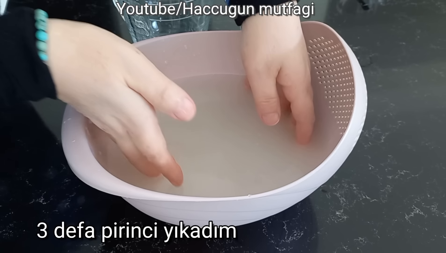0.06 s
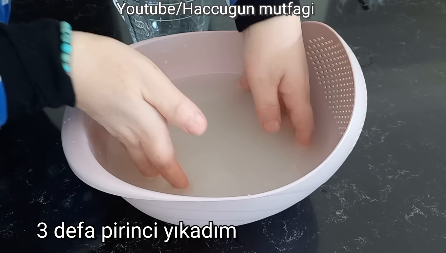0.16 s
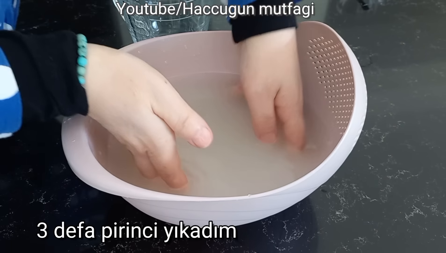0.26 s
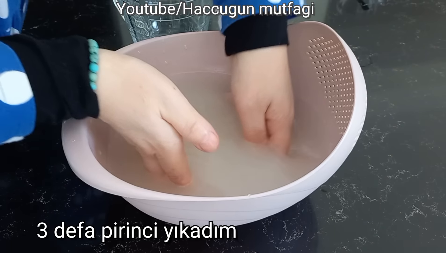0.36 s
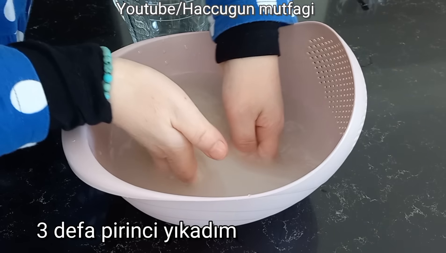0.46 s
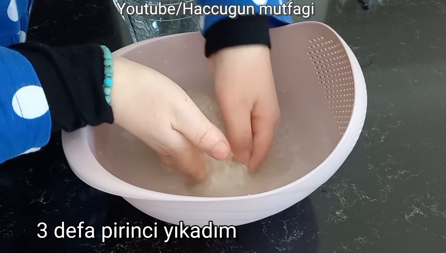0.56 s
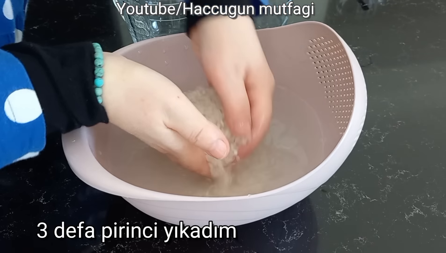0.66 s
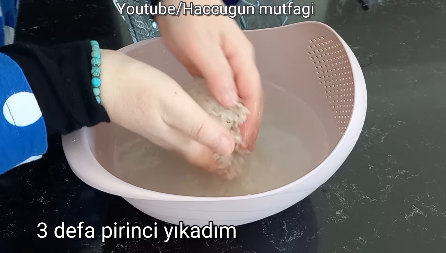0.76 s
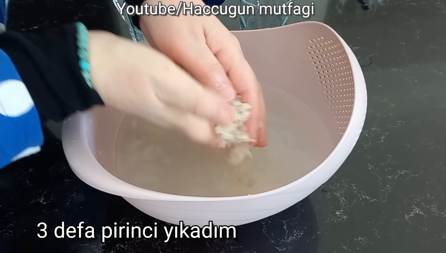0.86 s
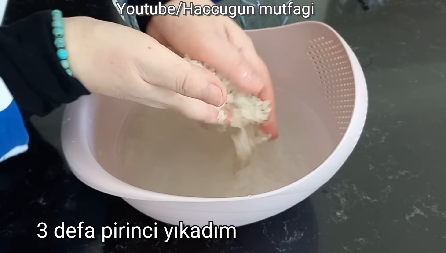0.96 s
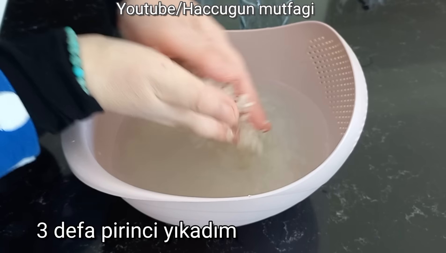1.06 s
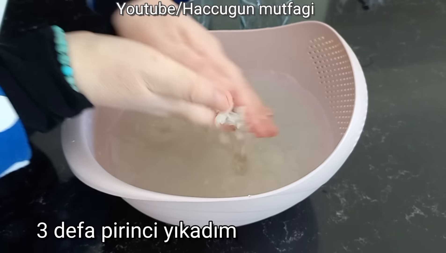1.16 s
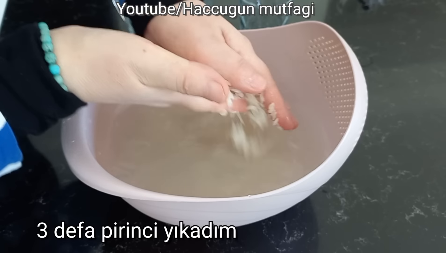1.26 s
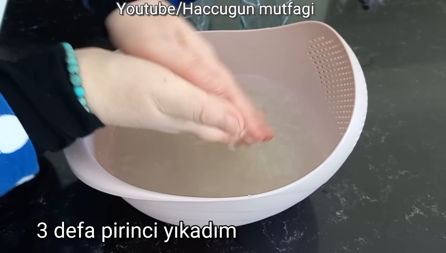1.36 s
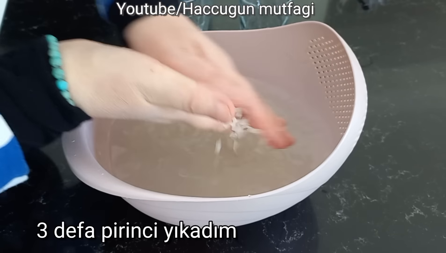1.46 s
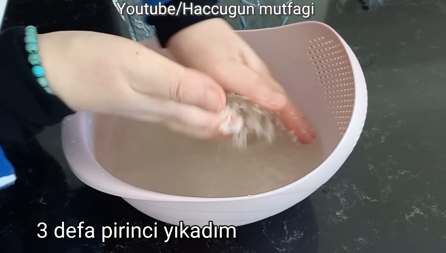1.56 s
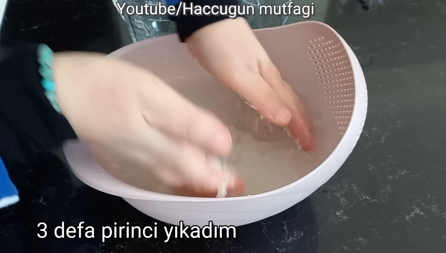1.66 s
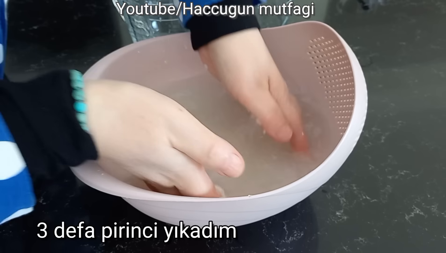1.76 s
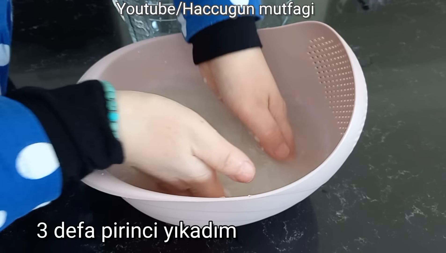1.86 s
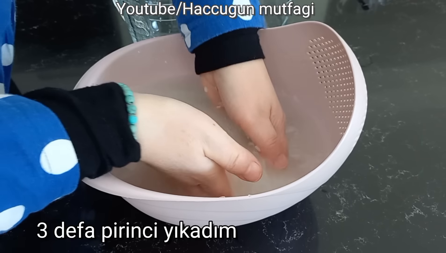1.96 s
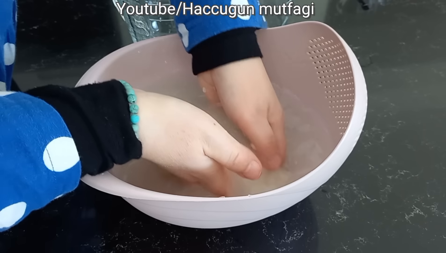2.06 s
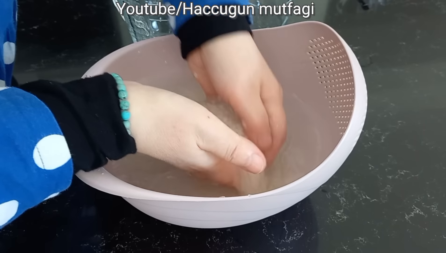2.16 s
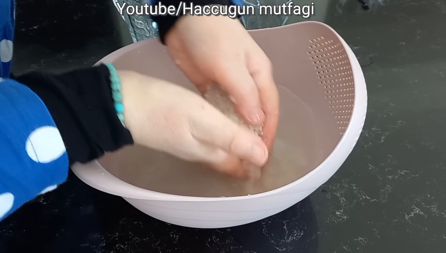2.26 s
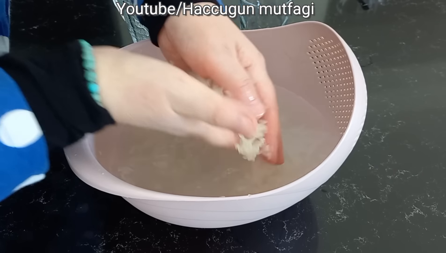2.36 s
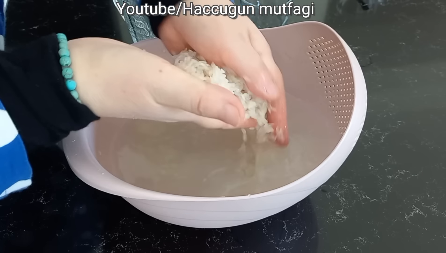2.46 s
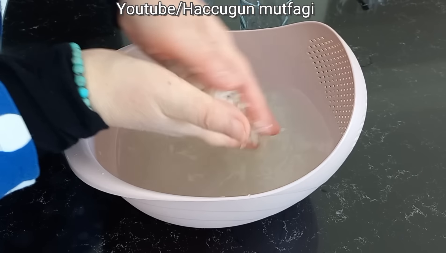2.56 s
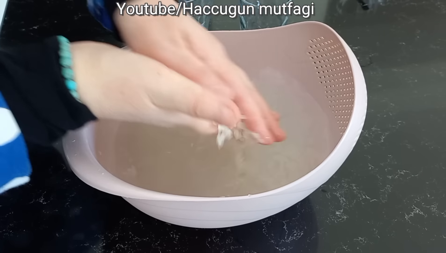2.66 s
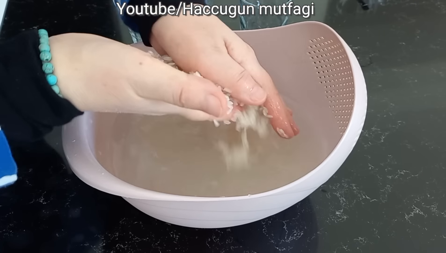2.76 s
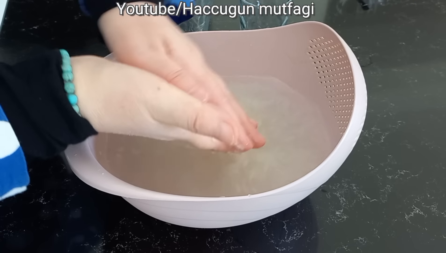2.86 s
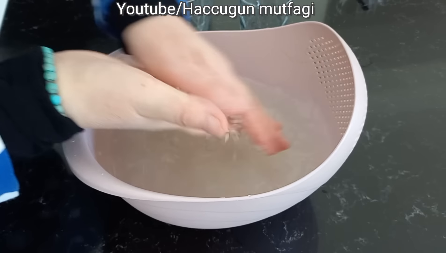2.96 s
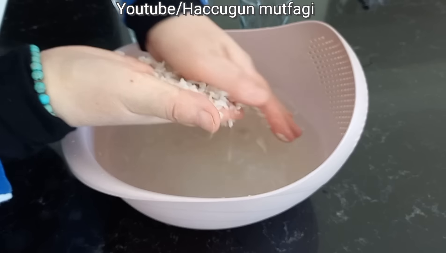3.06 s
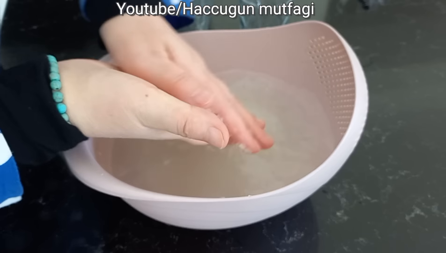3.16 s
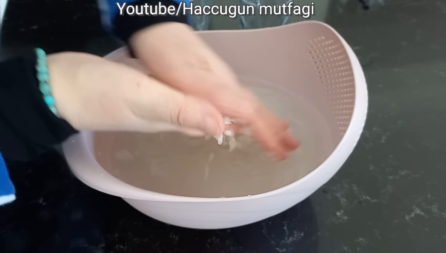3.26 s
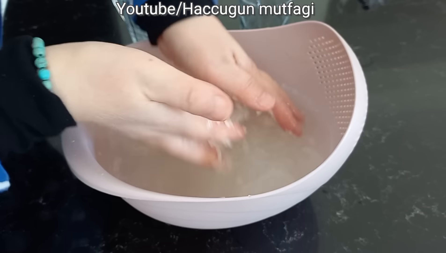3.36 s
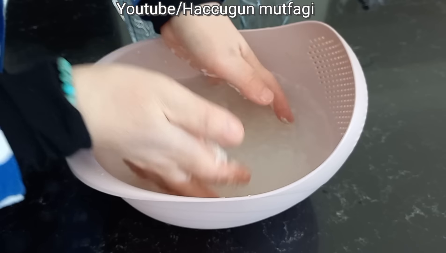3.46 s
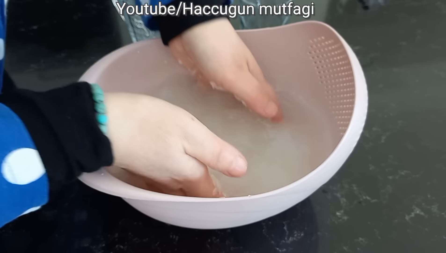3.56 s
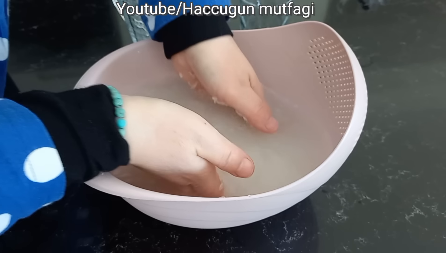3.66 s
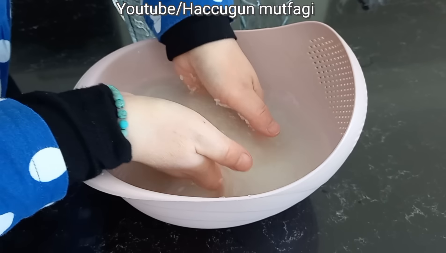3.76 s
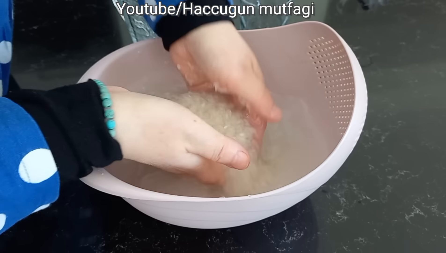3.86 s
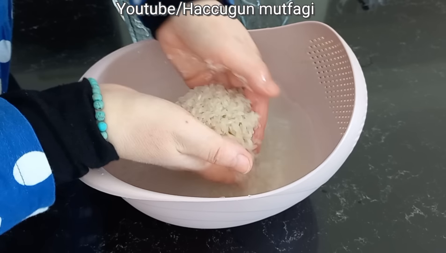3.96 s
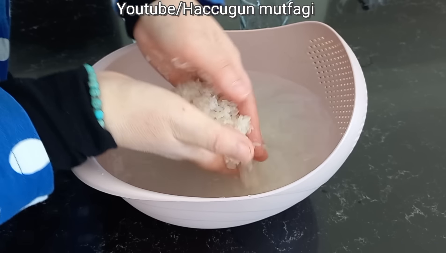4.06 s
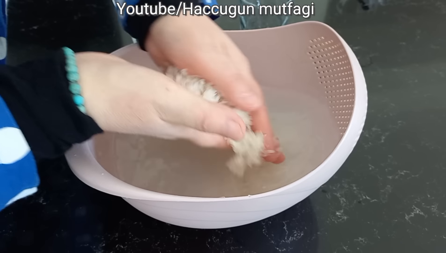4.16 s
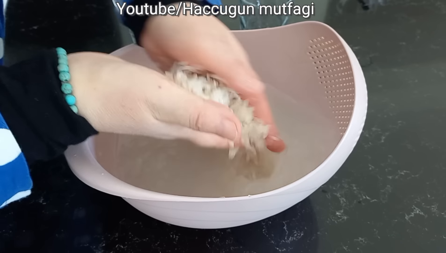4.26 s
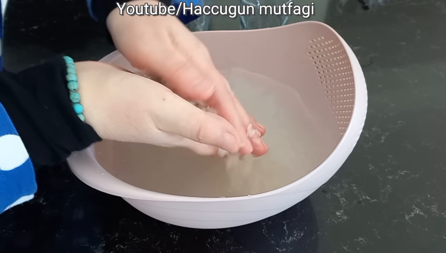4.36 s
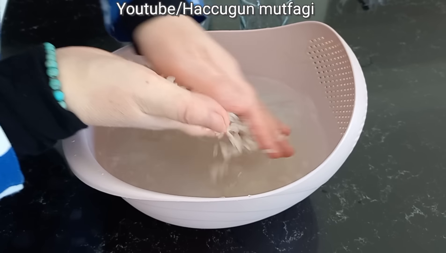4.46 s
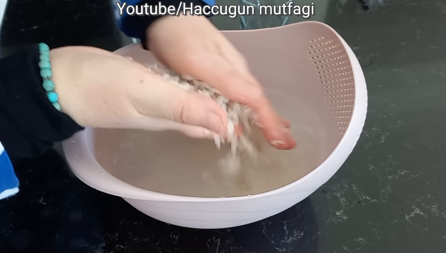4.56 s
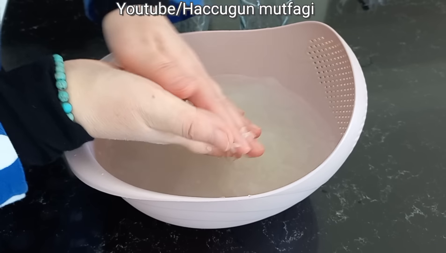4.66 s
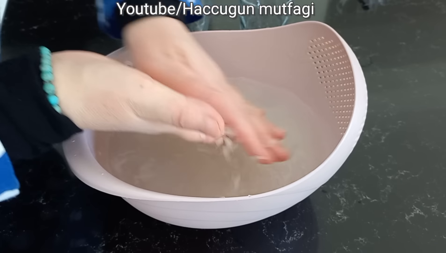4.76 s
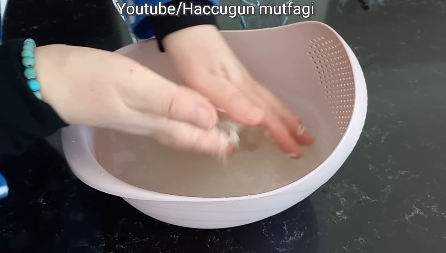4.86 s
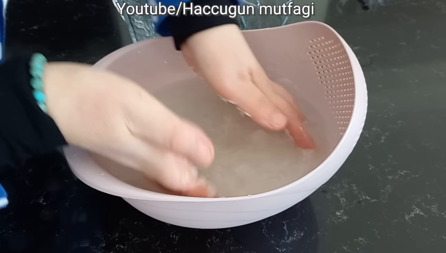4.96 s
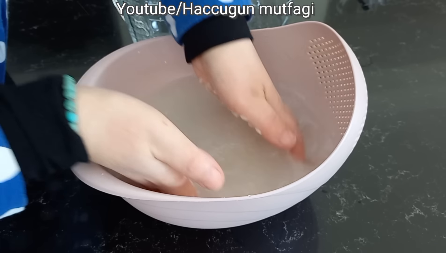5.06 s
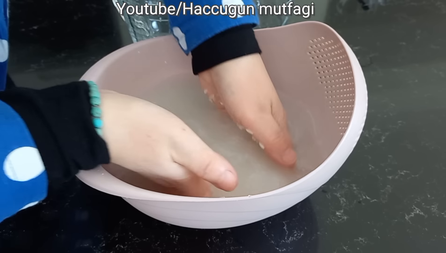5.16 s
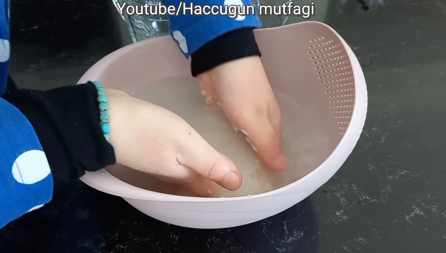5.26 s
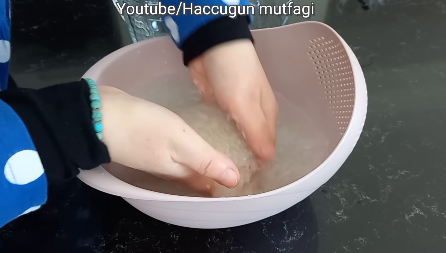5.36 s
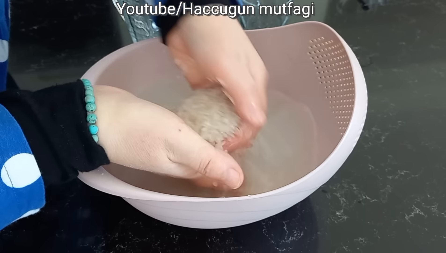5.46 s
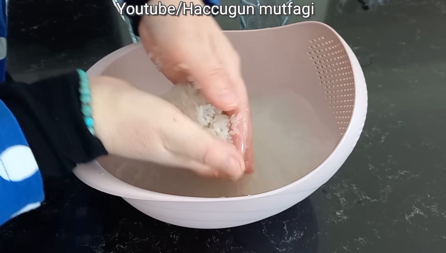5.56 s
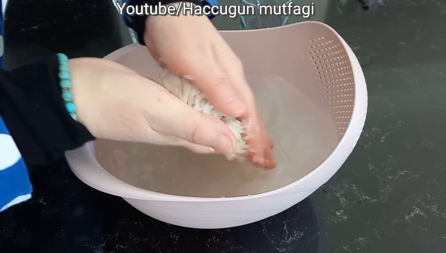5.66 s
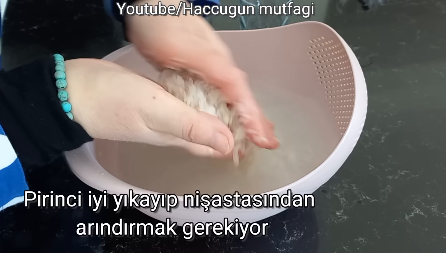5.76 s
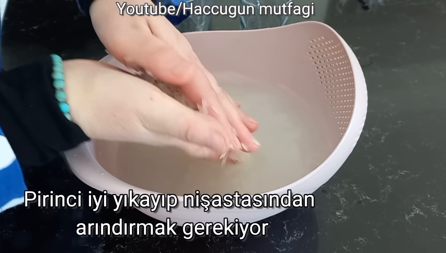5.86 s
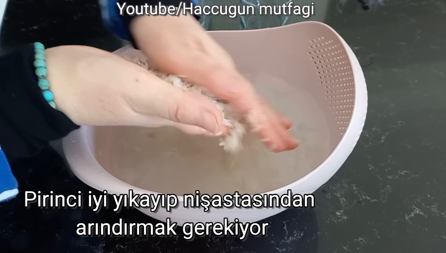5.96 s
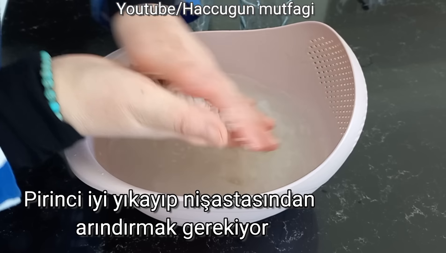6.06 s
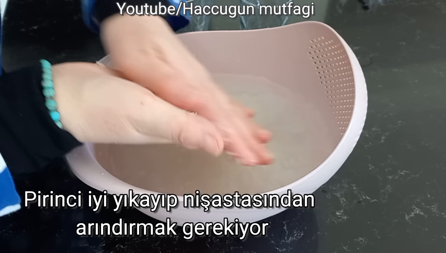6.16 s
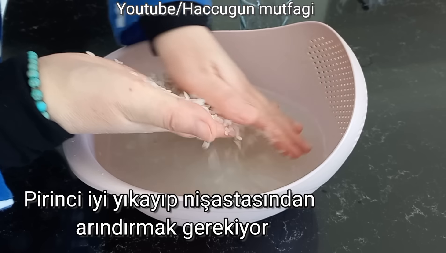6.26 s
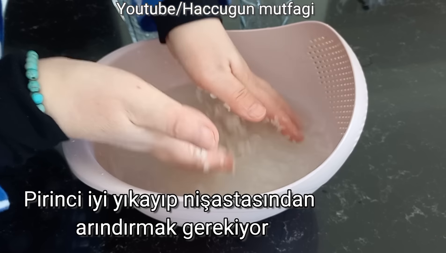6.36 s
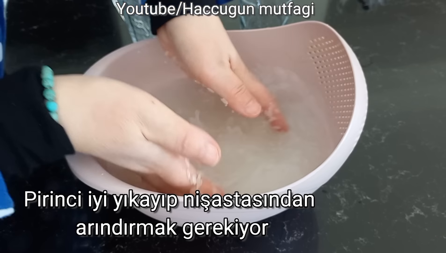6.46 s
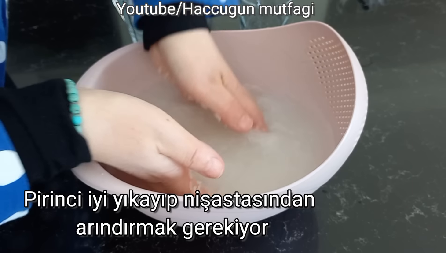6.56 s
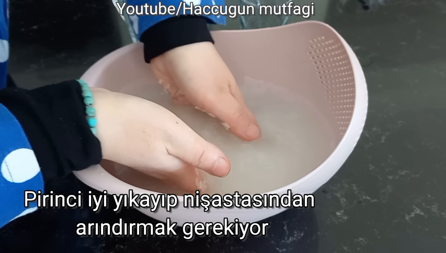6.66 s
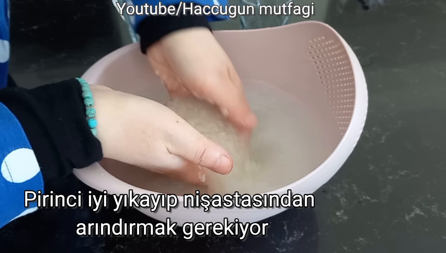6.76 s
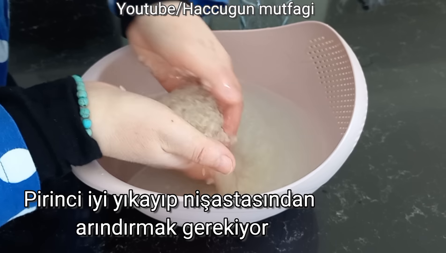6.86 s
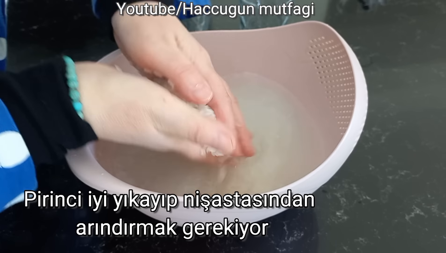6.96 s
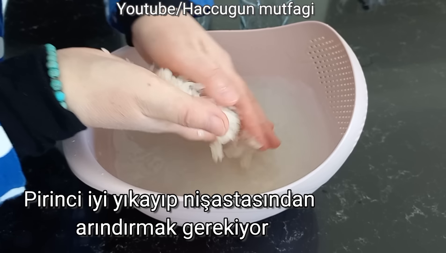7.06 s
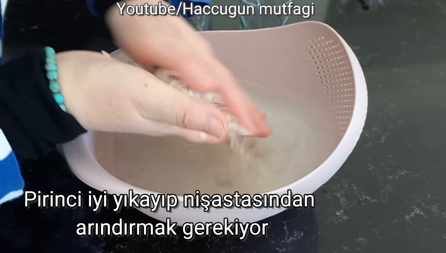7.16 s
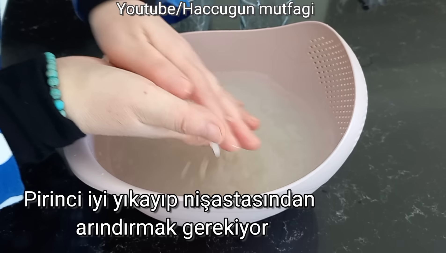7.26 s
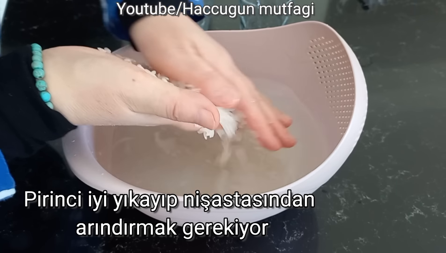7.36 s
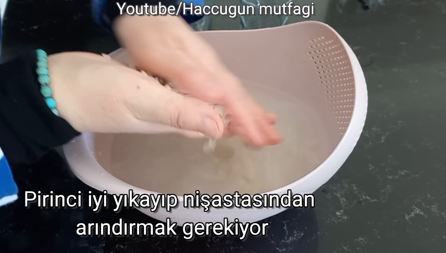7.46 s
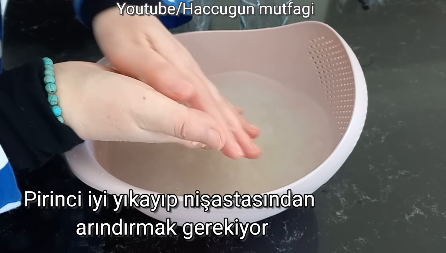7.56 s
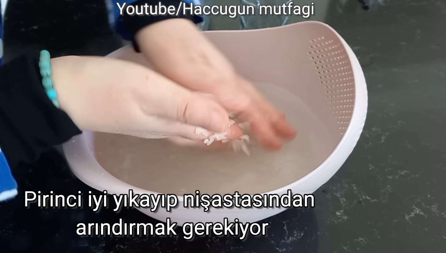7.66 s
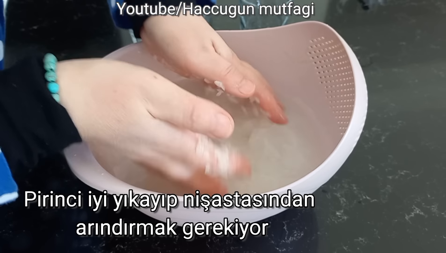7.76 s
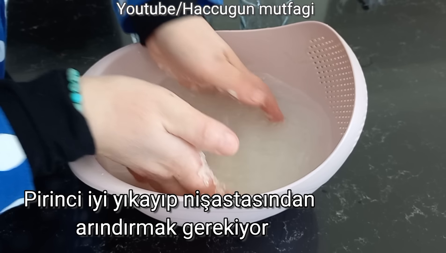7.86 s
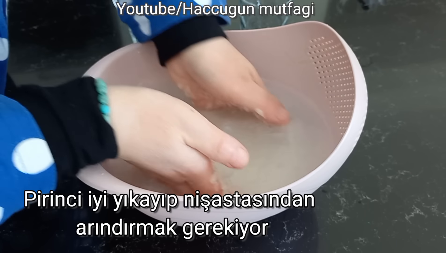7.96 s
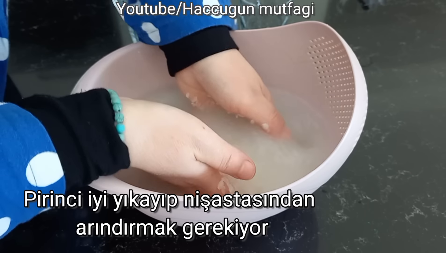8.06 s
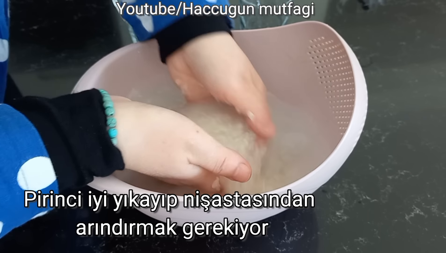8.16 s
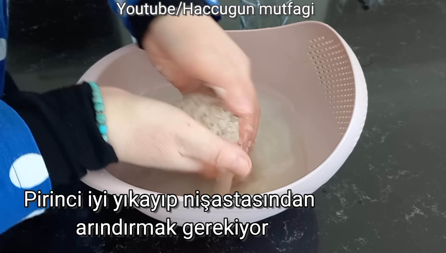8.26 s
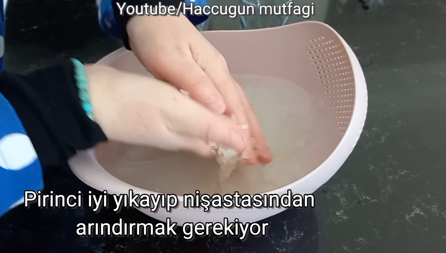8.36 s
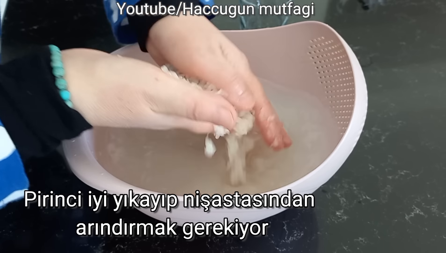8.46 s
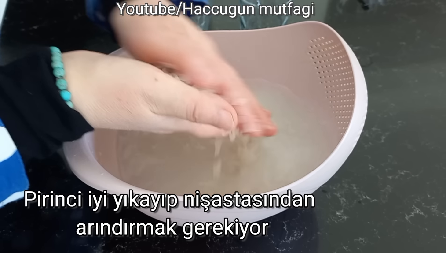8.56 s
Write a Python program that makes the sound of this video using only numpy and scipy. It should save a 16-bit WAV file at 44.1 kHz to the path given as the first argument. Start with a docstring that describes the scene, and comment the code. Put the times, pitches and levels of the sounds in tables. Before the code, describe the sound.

For the first second there is only a soft, muffled stir of hands moving rice through water in a plastic bowl, over a faint kitchen hiss and whir. From 1 to 1.8 seconds a dripping handful is rubbed between the palms in quick strokes: wet grains crunch, air pockets squelch sharply, and falling water makes small bubbly plops. Fingers knock dully on the bowl at about 1.8, 2.3 and 5 seconds. The rubbing returns from 2.3 to 3.5, 4 to 5, and 5.5 to 6.5 seconds, with a sharp wet pop near 3 seconds. Between rounds come quieter, low swishes as more rice is scooped up. A slightly gentler round runs from 7 to 7.9 seconds, and a last one starts at 8.3 and ends with a squelch near 8.6. Everything sounds close and slightly to the left, with short reflections from a small room.

```python
"""A muffled rumble stirs over the faint hiss of a small kitchen: two hands scoop rice through the water
in a plastic colander bowl. Again and again they lift a dripping handful and rub it between the palms.
Wet grains crunch by friction, air pockets burst and squelch, and falling water traps bubbles that ring
as tiny resonators. Fingers now and then knock the bowl; bowl, counter and walls add short reflections."""
import sys
import numpy as np
from scipy import signal
from scipy.fft import rfft, irfft, next_fast_len
from scipy.io import wavfile
from scipy.ndimage import map_coordinates

SR = 44100
rng = np.random.default_rng(int(sys.argv[2]) if len(sys.argv) > 2 else 0)


def digitize_waveform(pressure):
    """Quantize a signal to 16-bit integers and store it at the path in sys.argv[1].

    Rows of a 2-D input are taken as channels; values are limited to [-1, 1].
    """
    field = np.atleast_2d(pressure).T
    bounded = np.clip(field, -1, 1)
    quanta = np.round(bounded * 32767).astype(np.int16)
    wavfile.write(sys.argv[1], SR, quanta)


N = 380141

# Spectral envelopes: f/Hz, gain/dB
ROOM_SPECTRUM = [(20, -40), (40, -34), (60, -25), (80, -3), (108, -7), (135, -11.5), (320, -7), (600, -13),
                 (1100, -21), (2000, -9.5), (3600, -14), (5600, -20), (7400, -13), (11500, -25)]
GRIND_SPECTRUM = [(250, -26), (450, -7), (600, -3), (740, 3), (880, 2), (1100, 3.5), (1600, -4),
                  (3000, -66)]
SPRAY_SPECTRUM = [(500, -15.5), (1500, -2), (3000, 7), (6000, 2), (9000, 6.5), (12000, -5.5)]
CHURN_SPECTRUM = [(700, -51), (1050, -16.5), (1300, -5), (1600, -4), (2000, 2.5), (2600, -1.5), (3500, 6.5),
                  (6000, -31)]
CRUNCH_SPECTRUM = [(500, -27), (1200, -31), (2000, -4.5), (3200, -5), (5000, -1.5), (7200, -2.5), (8500, 2),
                   (10500, 3), (12000, -13.5)]
# Resonances of the background whir and of the bowl on the counter: f/Hz, half-width/Hz, gain/dB
WHIR_MODES = [(1800, 190, -2.5), (2765, 100, -7), (3455, 160, -12.5), (6160, 60, -17), (6630, 134, -11.5)]
BOWL_MODES = [(79, 6, -1), (110, 11, 2), (150, 13, -3), (209, 32, -3.5), (297, 41, -7.5)]
# Likeness of left and right: f/Hz, correlation
ROOM_COHERENCE = [(60, 0.0077), (170, 0.27), (500, 0.26), (1450, -0.063), (4180, 0.046), (12100, -0.11)]
BOWL_COHERENCE = [(120, 0.93), (350, 0.62)]
GRIND_COHERENCE = [(700, 0.53)]
SPRAY_COHERENCE = [(2000, 0.78), (9000, 0.091)]
# Reverberation time of the kitchen: f/Hz, T60/s
WALL_DECAY = [(150, 0.43), (1500, 0.32), (5000, 0.16), (12000, 0.07)]
# Event levels below are relative: each source adds its own gain.
# Hands or a fallen clump plough through submerged rice: t/s, length/s, rumble/dB, grinding/dB
SCOOP_MOVES = [(0.0, 0.021, -65.5, -83), (0.3, 0.034, -73, -78.5), (1.765, 0.024, -56.5, -66),
               (2.0, 0.039, -66.5, -76.5), (2.74, 0.078, -64.5, -61.5), (3.52, 0.11, -67, -71),
               (5.03, 0.046, -59, -67), (5.13, 0.12, -57.5, -75), (6.47, 0.013, -64, -70),
               (6.64, 0.087, -70, -73.5), (7.93, 0.026, -62.5, -64), (8.08, 0.029, -65.5, -73)]
# Fingers bump the submerged wall: t/s, level/dB
FINGER_BUMPS = [(1.772, -48.5), (2.216, -55.5), (2.302, -53.5), (3.489, -60), (5.012, -59), (5.037, -49)]
# Large bubbles trapped by falling drops and clumps: t/s, level/dB, f/Hz, decay/cycles
LARGE_BUBBLES = [(1.026, -43, 1960, 9.6), (1.153, -34, 1820, 4.6), (1.439, -48, 1674, 14.3),
                 (1.615, -40.5, 1380, 10.3), (2.216, -48, 1250, 4.3), (2.301, -29, 1890, 3.9),
                 (2.37, -40.5, 1820, 6.1), (2.563, -37, 1518, 11), (2.683, -39.5, 2078, 6.6),
                 (2.812, -36.5, 864, 9.1), (2.895, -42, 2043, 8.1), (3.005, -33.5, 1345, 7.8),
                 (3.14, -40.5, 2124, 6.8), (3.149, -42.5, 1470, 12.7), (3.287, -38.5, 2152, 7),
                 (4.008, -56.5, 1280, 10), (4.156, -33.5, 2040, 2.3), (4.313, -34, 1875, 6.7),
                 (4.6, -39.5, 1508, 4.44), (4.64, -39.5, 2056, 10.7), (4.7, -31, 1896, 5.5),
                 (4.909, -42.5, 2230, 11), (5.464, -42, 1512, 5.5), (5.602, -33, 1163, 8.3),
                 (5.629, -40, 1940, 5), (5.649, -35, 1980, 3.9), (5.808, -38, 1940, 5.1),
                 (5.856, -26, 2210, 4.8), (6.158, -41, 2060, 10.1), (7.409, -47.5, 1201, 9),
                 (7.542, -37, 2016, 9), (7.572, -40.5, 1373, 10), (8.378, -42.5, 1840, 5.8),
                 (8.444, -45, 1250, 7.7)]
# Loud air pockets bursting between the palms: t/s, level/dB, f/Hz, spray/dB re that level
AIR_POCKETS = [(1.0252, -21.5, 9700, -17), (1.101, -27, 5200, -9), (1.1105, -28, 4720, -10),
               (1.4507, -27, 5590, -22), (1.697, -26, 2600, -6.5), (1.7609, -20.5, 3880, -8.5),
               (1.7997, -30, 7260, -4.5), (1.8336, -39, 3420, -2.5), (2.37, -43, 2460, -2.5),
               (2.4882, -33.5, 4370, -11.5), (2.5644, -31, 2710, -4.5), (2.6329, -26, 5400, -29),
               (2.809, -23.5, 3635, -3), (3.0056, -16.5, 8900, -12), (3.116, -31, 3630, -22),
               (4.0095, -34, 4400, -17), (4.156, -31, 2310, -9.5), (4.295, -28.5, 3230, -12.5),
               (4.6017, -26, 3240, -17), (4.6934, -33, 3034, -3), (4.7873, -24.5, 10800, -17.5),
               (4.909, -36, 2770, -7), (5.004, -21.5, 8660, -14), (5.5142, -34, 5900, -12),
               (5.8036, -25.5, 5020, -14), (5.856, -26, 2880, -8.5), (6.0004, -29, 10900, -11),
               (6.066, -26, 4950, -17), (6.0783, -28, 2710, -11), (6.1323, -25, 3320, -8),
               (6.2302, -27.5, 9620, -6.5), (6.2422, -31, 8300, -2), (6.2466, -30.5, 5730, -3.5),
               (6.6152, -33, 6230, -10), (6.7985, -32, 8800, -28), (6.9242, -32.5, 2950, -25),
               (7.171, -35, 3080, -6.5), (7.3223, -31.5, 3090, -2), (7.4957, -36, 2270, -7),
               (8.2926, -35, 3735, -14), (8.5792, -22, 2730, -6.5)]
# A lifted handful trickles: t/s, length/s, grains/dB, water/dB
LIFTED_HANDFULS = [(1.0, .72, -61, -61), (2.298, 1.17, -61.5, -61), (3.99, 0.018, -66.5, -72),
                   (4.198, .65, -58.5, -57.5), (5.49, .85, -59, -56.5), (6.95, .93, -60, -59.5),
                   (8.312, .31, -59.5, -56.5)]
# One palm slides over the other: t/s, length/s, grains/dB, water/dB
PALM_STROKES = [(1.107, 0.082, -47.5, -52), (1.242, 0.096, -48.5, -53.5), (1.399, 0.054, -45.5, -51.5),
                (1.54, 0.05, -47.5, -58), (1.705, 0.016, -42.5, -42.5), (1.773, 0.037, -52, -45),
                (2.588, 0.045, -48.5, -44.5), (2.737, 0.12, -48.5, -50), (2.899, 0.05, -46, -52),
                (3.022, .056, -44, -51.5), (3.18, 0.036, -46, -53.5), (3.339, .012, -48.5, -62),
                (3.475, 0.024, -47, -66), (4.298, 0.055, -51, -50.5), (4.387, 0.025, -46.5, -47),
                (4.518, 0.1, -50.5, -54.5), (4.676, 0.047, -45, -50.5), (4.836, 0.019, -47.5, -76),
                (4.99, 0.026, -44, -58), (5.86, 0.013, -48.5, -47.5), (5.976, 0.023, -47, -53.5),
                (6.067, 0.0087, -45.5, -62), (6.134, 0.013, -42, -61), (6.261, 0.07, -45, -75),
                (6.458, 0.01, -45, -65), (7.248, 0.074, -47, -46.5), (7.4, 0.028, -49, -61),
                (7.55, 0.028, -46, -46.5), (7.688, .013, -49.5, -78), (7.831, 0.0096, -44, -55.5),
                (8.446, 0.096, -53.5, -69), (8.584, .04, -47.5, -57)]

# Times to gain and to lose 20 dB: rise/s, fall/s
SCOOP_RAMPS, HANDFUL_RAMPS, STROKE_RAMPS = (0.08, 0.26), (0.17, 0.77), (0.076, 0.071)
FALLOUT_RUMBLE_DB, FALLOUT_GRIND_DB = -26.5, -31.5  # rice dropping into the bowl, re the crunch
LAPPING_DB = -77  # the water never quite comes to rest
TOP_HZ = 11800


def amp(db):
    """The decibel scale: 20 dB is a factor of ten in amplitude."""
    return 10 ** (np.asarray(db) / 20)


def unit(x):
    """Normalisation to rms 1."""
    return x / np.sqrt(np.mean(x ** 2) + 1e-20)


def power_sum(*levels_db):
    """Incoherent addition: unrelated sounds add in power; the result is in dB."""
    return 10 * np.log10(sum(amp(db) ** 2 for db in levels_db) + 1e-20)


def along(points, hz):
    """Interpolation of (f/Hz, value) points on a logarithmic frequency axis."""
    f, values = np.transpose(points)
    return np.interp(np.log(hz + 1), np.log(f + 1), values)


def wobble(rate):
    """Random modulation: a smooth curve with `rate` knots a second."""
    return map_coordinates(rng.standard_normal(int(N * rate / SR) + 4), [np.arange(N) * rate / SR])


def filtered(x, response):
    """Linear filtering: the spectrum is multiplied by a frequency response."""
    size = next_fast_len(N + SR // 4)
    return irfft(rfft(x, size) * response(np.fft.rfftfreq(size, 1 / SR)), size)[..., :N]


def coloured(x, spectrum):
    """Spectral shaping by (f/Hz, gain/dB) points."""
    return filtered(x, lambda hz: amp(along(spectrum, hz)))


def resonant(x, modes):
    """Modal superposition: each mode passes a Lorentzian band."""
    return filtered(x, lambda hz: sum(amp(db) / (1 + ((hz - f) / width) ** 2) for f, width, db in modes))


def spread(pair, coherence):
    """Partial coherence: two independent signals mix as mid and side into left and right."""
    def weights(hz):
        angle = np.arccos(np.clip(along(coherence, hz), -1, 1)) / 2
        return np.array([np.cos(angle), np.sin(angle)])
    mid, side = filtered(pair, weights)
    return np.array([mid + side, mid - side])


def noise(coherence):
    """Partially coherent white noise in stereo."""
    return spread(rng.standard_normal((2, N)), coherence)


def place(times, rows):
    """Superposition of short sounds, one a row, at their start times."""
    at = np.round(np.abs(times) * SR).astype(int)[:, None] + np.arange(rows.shape[1])
    return np.bincount(at.ravel(), rows.ravel(), N)[:N]


def pings(times, hz, gain, cycles, attack, size, glide=0, lead_ms=0):
    """Damped oscillators, `size` samples long, decaying by 1/e in `cycles`; left leads by lead_ms."""
    channels = []
    for side in (1, -1):
        t = np.maximum(np.arange(size) / SR + side * np.reshape(lead_ms, (-1, 1)) / 2000, 0)
        turns = np.reshape(hz, (-1, 1)) * t
        age = turns / np.reshape(cycles, (-1, 1))
        envelope = np.exp(-age) * (1 - np.exp(-attack * age))
        tone = np.sin(2 * np.pi * turns * (1 + glide * age))
        channels.append(place(times, gain[:, None] * envelope * tone))
    return np.array(channels)


def swarm(mid_hz, octaves, cycles, scatter_db, scatter_ms, count, size, glide=0):
    """Shot noise: many small pings of random time, pitch, strength and direction."""
    hz = np.clip(mid_hz * 2 ** (octaves * rng.standard_normal(count)), 200, SR / 3)
    gain = amp(scatter_db * np.minimum(rng.exponential(size=count), 4))
    times = rng.random(count) * N / SR
    lead_ms = scatter_ms * rng.standard_normal(count)
    return pings(times, hz, gain, cycles, attack=7.6, size=size, glide=glide, lead_ms=lead_ms)


def swells(moves, rise_s, fall_s):
    """Exponential growth and decay around each held move; one summed dB curve per level column."""
    t = np.linspace(0, N / SR, N // 32)
    start, length, *levels = np.transpose(moves)[:, :, None]
    shape_db = -20 * (np.maximum(start - t, 0) / rise_s + np.maximum(t - start - length, 0) / fall_s)
    return np.array([np.interp(np.arange(N) / SR, t, power_sum(*(db + shape_db))) for db in levels])


def strays(db, mid_hz, octaves, last_column, count):
    """Stratified random events while the palms press: t/s, level/dB, f/Hz, last_column."""
    start, length = np.transpose(PALM_STROKES)[:2]
    pressed_s = np.cumsum(length)
    moment = (np.arange(count) + rng.random(count)) / count * pressed_s[-1]
    stroke = np.searchsorted(pressed_s, moment)
    times = start[stroke] + pressed_s[stroke] - moment
    loud, high = rng.standard_normal((count, 2)).T
    hz = np.minimum(mid_hz * 2 ** (octaves * high), TOP_HZ)
    return np.column_stack([times, db + 2.5 * loud, hz, np.full(count, last_column)])


def background():
    """Ambient noise: a broad, low room sound and a faint whir of narrow resonances."""
    air = unit(coloured(noise(ROOM_COHERENCE), ROOM_SPECTRUM))
    whir = unit(resonant(noise(ROOM_COHERENCE), WHIR_MODES))
    return amp(-69 + 0.22 * wobble(8.1)) * air + amp(-67.5 + 0.62 * wobble(3.2)) * whir


def reflections(bowl_db, wall_db):
    """Impulse response: bowl and counter reflect short waves early; the walls add a diffuse tail."""
    hz, t, spectra = signal.stft(rng.standard_normal((2, SR // 3)), SR, nperseg=256)
    decay = amp(-60 * t / along(WALL_DECAY, hz)[:, None])
    tail = signal.istft(spectra * decay * (1 - np.exp(-t / 0.0046)), SR, nperseg=256)[1]
    t = np.arange(tail.shape[1]) / SR
    early = rng.standard_normal(tail.shape) * amp(-60 * t / 0.014) * (1 - np.exp(-t / 0.0017))
    early = signal.sosfilt(signal.butter(2, 2000, "high", fs=SR, output="sos"), early)
    return amp(bowl_db) * early / np.linalg.norm(early[0]) + amp(wall_db) * tail / np.linalg.norm(tail[0])


def room(x, bowl_db, wall_db):
    """Time-varying convolution: the moving hands change the reflections three times a second."""
    hop = SR // 3
    direct = np.pad(x, ((0, 0), (hop, SR)))
    heard = direct.copy()
    fade = signal.get_window("hann", 2 * hop)
    for at in range(0, N + hop, hop):
        echo = signal.fftconvolve(direct[:, at:at + 2 * hop] * fade, reflections(bowl_db, wall_db), axes=1)
        heard[:, at:at + echo.shape[1]] += echo
    return heard[:, hop:hop + N]


def bowl_rumble(crunch_db):
    """Forced vibration: scooping, falling rice and lapping water drive the bowl's low modes."""
    scoop_db = swells(SCOOP_MOVES, *SCOOP_RAMPS)[0]
    rumble_db = power_sum(scoop_db, crunch_db + FALLOUT_RUMBLE_DB, LAPPING_DB)
    shake = resonant(noise(BOWL_COHERENCE), BOWL_MODES)
    return unit(shake) * amp(rumble_db + 0.85 * wobble(25) - 2.5)


def scooping(crunch_db):
    """Sliding friction: rice grinds over the submerged plastic, muffled by the water."""
    scoop_db = swells(SCOOP_MOVES, *SCOOP_RAMPS)[1]
    grind_db = power_sum(scoop_db, crunch_db + FALLOUT_GRIND_DB)
    scrapes = coloured(noise(GRIND_COHERENCE), GRIND_SPECTRUM)
    return unit(scrapes) * amp(grind_db + 3.7 * wobble(50))


def knocks():
    """Impact excitation: the water-loaded wall rings with a hollow note and the whole bowl thuds."""
    times, db = np.transpose(FINGER_BUMPS)
    note = pings(times, hz=760, gain=amp(db + 4), cycles=3.8, attack=9.9, size=2600)
    thud_db = db + 2.7 * (db - db.max()) - 3.5  # only a hard bump moves the whole bowl
    thud = pings(times, hz=138, gain=amp(thud_db), cycles=4.2, attack=8.6, size=9000)
    return note + thud


def bubbles():
    """Bubble resonance: trapped air is a spring, water its mass; pitch climbs near the surface."""
    small = strays(db=-46.5, mid_hz=2114, octaves=0.276, last_column=9.7, count=18)
    times, db, hz, cycles = np.vstack([LARGE_BUBBLES, small]).T
    lead_ms = 0.013 * rng.standard_normal(len(times))
    return pings(times, hz, amp(db + 5.5), cycles, attack=3.5, size=2600, glide=0.01, lead_ms=lead_ms)


def squelches():
    """Cavity resonance: an air pocket leaks, bursts in a spit of spray and rings for a few cycles."""
    small = strays(db=-39, mid_hz=4200, octaves=0.57, last_column=-9, count=22)
    times, db, hz, spray_db = np.vstack([AIR_POCKETS, small]).T
    lead_ms = 0.098 * rng.standard_normal(len(times))
    cavity = pings(times + 0.00054, hz, amp(db - 1.5), cycles=4.7, attack=4.8, size=800,
                   glide=-0.01, lead_ms=lead_ms)
    t = np.arange(SR // 50) / SR - 0.006
    leak = 0.053 * np.exp(-np.abs(t) / 0.00099)
    burst = np.exp(-np.abs(t - 0.0012) / 0.00095)
    hiss = rng.standard_normal((2, len(times), len(t)))
    spits = amp(db + spray_db + 2.5)[:, None] * (leak + burst) * hiss
    spray = coloured(np.array([place(times + t[0], rows) for rows in spits]), SPRAY_SPECTRUM)
    return cavity + spread(spray, SPRAY_COHERENCE)


def handwork():
    """Power addition of trickle and palm strokes gives the levels of grains and of water, in dB."""
    levels_db = power_sum(swells(PALM_STROKES, *STROKE_RAMPS), swells(LIFTED_HANDFULS, *HANDFUL_RAMPS))
    return levels_db + 0.6 * wobble(24)  # the palms never press evenly


def rubbing(crunch_db, churn_db):
    """Granular friction: wet grains tick in clumps; drops and tiny bubbles ring in the expelled water."""
    ticks = swarm(5870, octaves=0.74, cycles=0.78, scatter_db=3, scatter_ms=0.055, count=36000, size=32)
    snaps = swarm(5800, octaves=0.67, cycles=1.7, scatter_db=5.5, scatter_ms=0.064, count=1000, size=64)
    drips = swarm(4025, octaves=0.612, cycles=11.4, scatter_db=3, scatter_ms=0.053, count=1800, size=400,
                  glide=0.011)
    froth = swarm(2066, octaves=0.486, cycles=4.8, scatter_db=3, scatter_ms=0.039, count=7000, size=300,
                  glide=0.012)
    clumps_db = 1.3 * wobble(110)
    crunch = unit(coloured(ticks, CRUNCH_SPECTRUM)) * amp(crunch_db + clumps_db - 0.78)
    # wet films keep snapping under a light touch, so they stand out when the rubbing is gentle
    touching = crunch_db > -77
    crackle = unit(coloured(snaps, CRUNCH_SPECTRUM)) * amp(0.85 * crunch_db - 14) * touching
    tinkle = unit(coloured(drips, CRUNCH_SPECTRUM)) * amp(crunch_db - 7)
    churn = unit(coloured(froth, CHURN_SPECTRUM)) * amp(churn_db + clumps_db - 3.5)
    return crunch + crackle + tinkle + churn


def scene():
    """Interaural time and level differences place the washing slightly to the left in the kitchen."""
    crunch_db, churn_db = handwork()
    washing = rubbing(crunch_db, churn_db) + scooping(crunch_db) + knocks() + bubbles() + squelches()
    side, lead_ms = np.array([[1], [-1]]), 0.066
    washing = filtered(washing, lambda hz: np.exp(1j * np.pi * hz * lead_ms / 1000 * side))
    washing *= amp(0.3 * side)
    return room(washing, bowl_db=-4, wall_db=-10.5) + bowl_rumble(crunch_db) + background()


def record(dry):
    """Band limiting: a steep low-pass removes the treble above TOP_HZ."""
    return filtered(dry, lambda hz: 1 / np.sqrt(1 + (hz / TOP_HZ) ** 90))


dry = scene()
out = record(dry)
digitize_waveform(out)
```